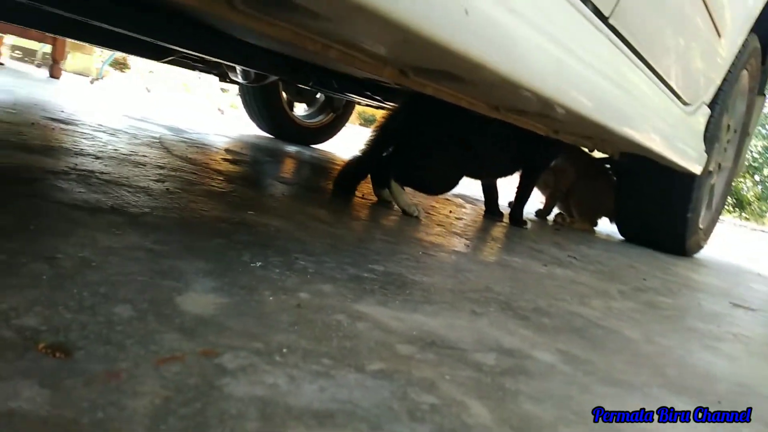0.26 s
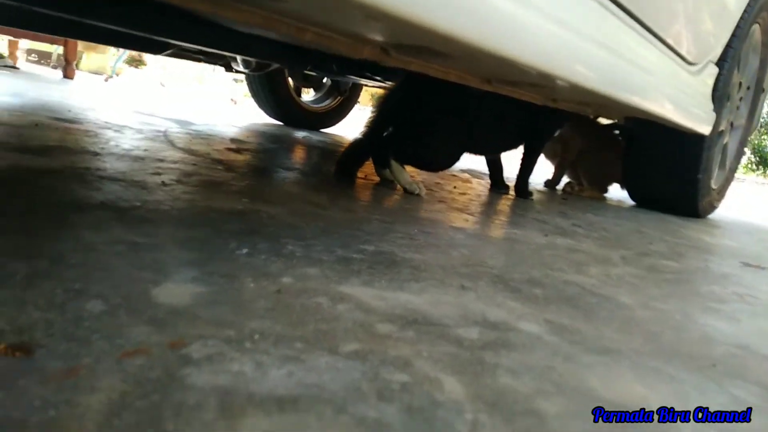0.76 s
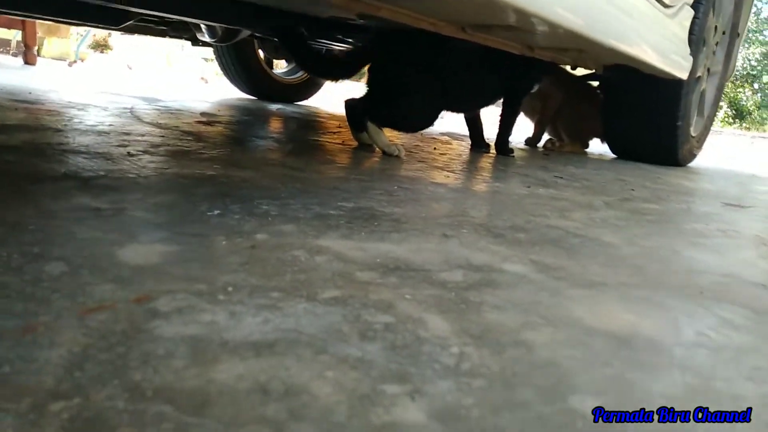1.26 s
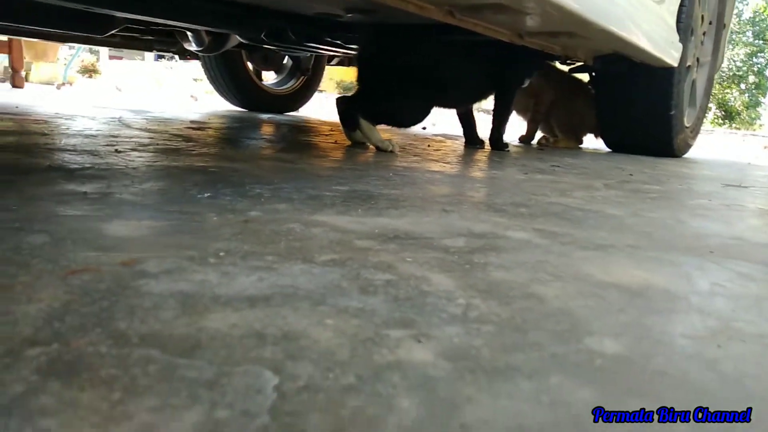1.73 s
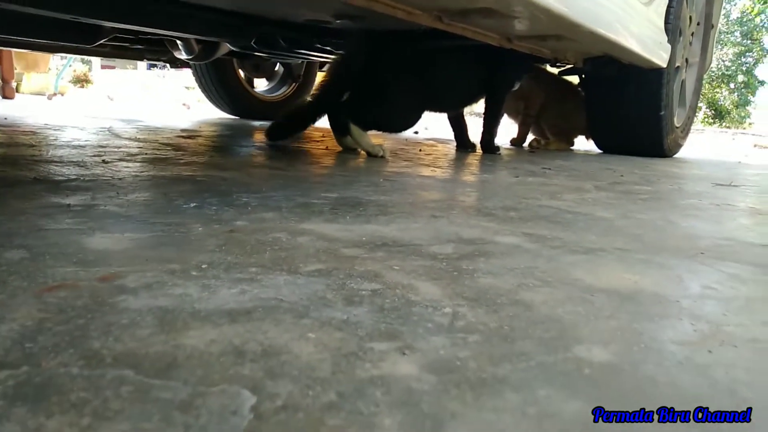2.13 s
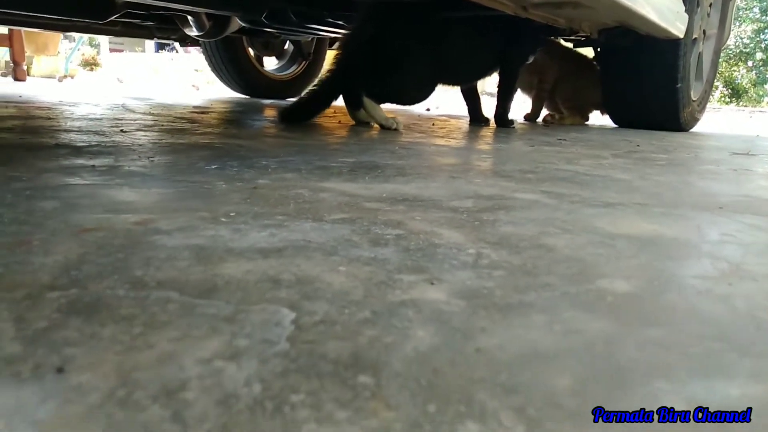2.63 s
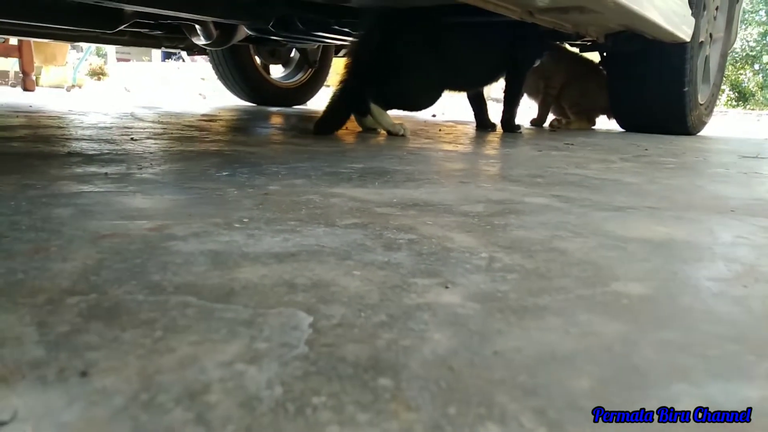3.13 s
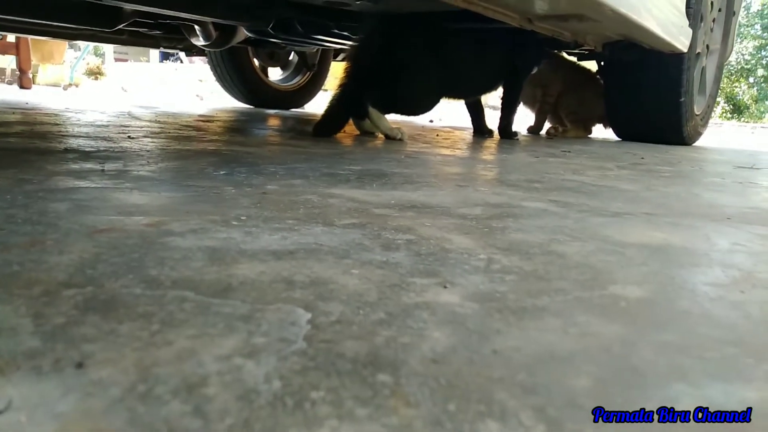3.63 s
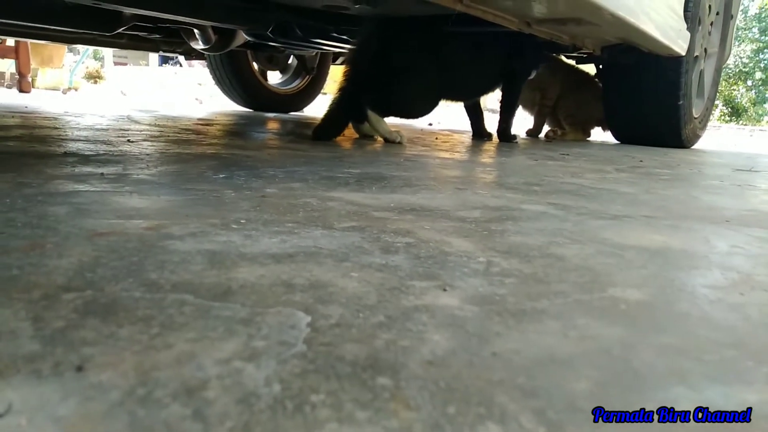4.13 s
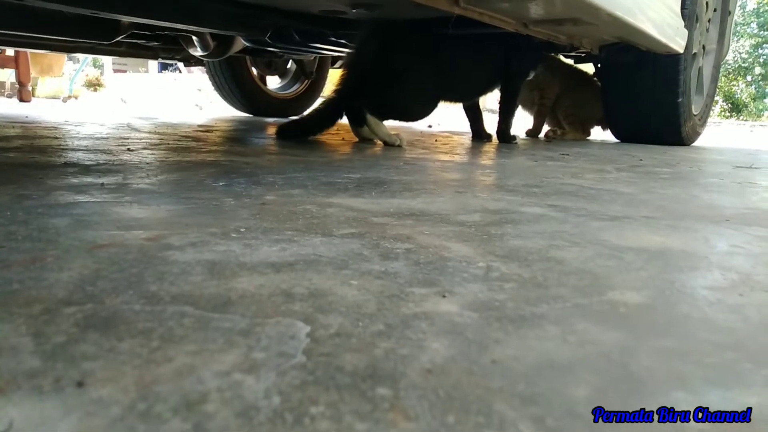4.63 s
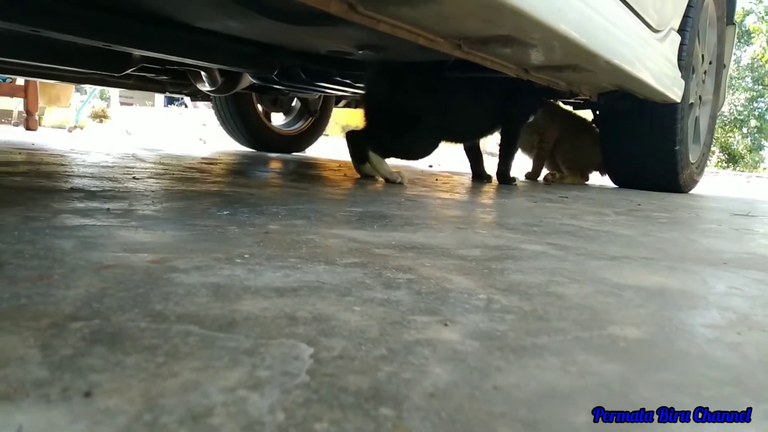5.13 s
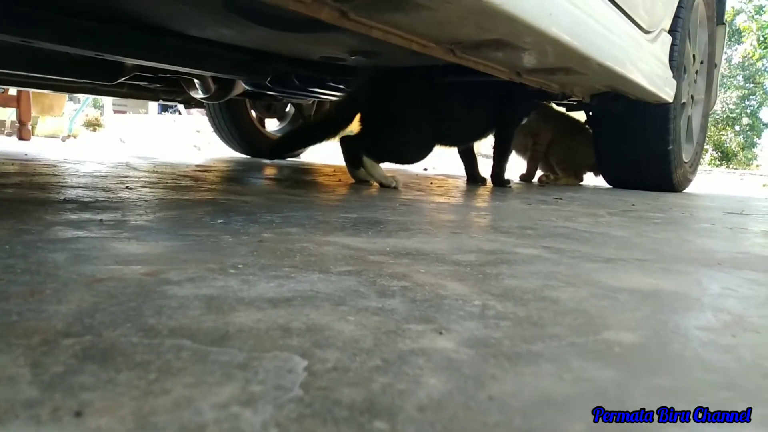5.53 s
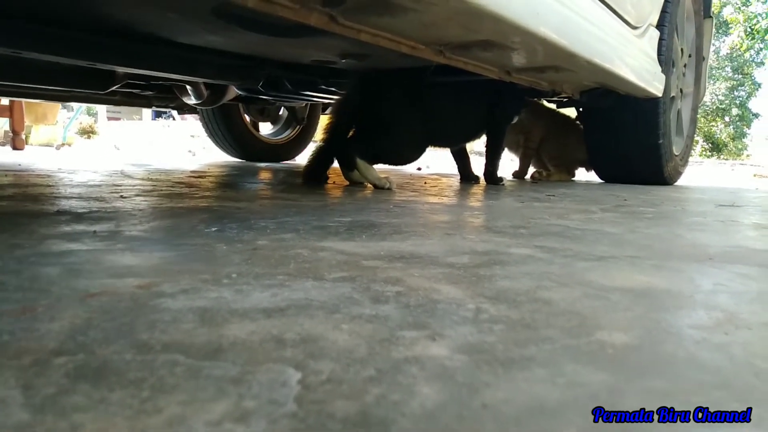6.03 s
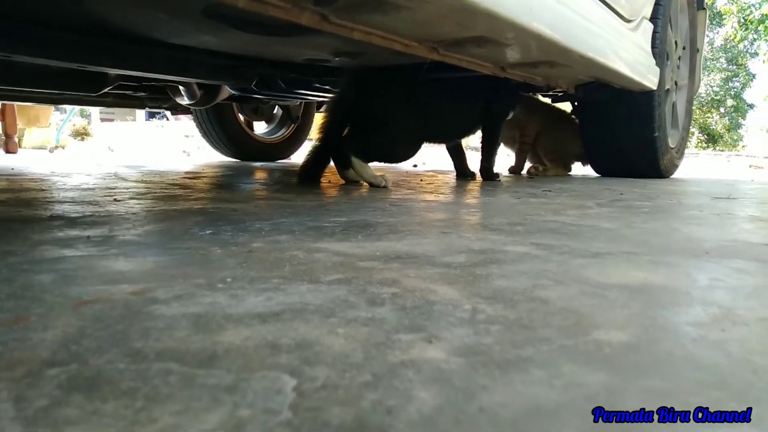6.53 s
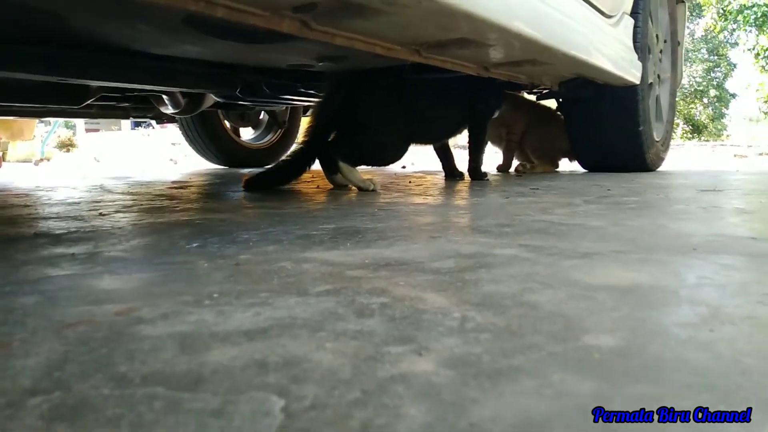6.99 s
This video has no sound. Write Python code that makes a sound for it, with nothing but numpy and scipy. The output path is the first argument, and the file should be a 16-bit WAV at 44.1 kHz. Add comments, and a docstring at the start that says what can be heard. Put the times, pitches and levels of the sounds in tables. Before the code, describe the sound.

Two cats yowl in a standoff beneath a parked car, heard from fairly close over concrete, with a slightly hollow, short reflection. The lower, brighter voice starts almost at once, sweeps up within half a second and holds a loud, open, nasal wail; the higher, thinner cat briefly whimpers at the start and joins at about 0.8 s. Around 1.4 s the first voice catches hoarsely, and both close down into quieter, sinking moans until about 3.3 s. A short lull holds distant chirps and a barely audible tap at 3.8 s. At 3.9 s both leap up together, the loudest moment, with a tiny dry click near 4.3 s. The higher cat fades by 5.4 s; the lower one wails on, sagging gradually, and the higher adds a softer cry from 6.3 s. Both die away near 7.2 s. Faint sparrows, airy hiss and low rumble continue throughout, with a faint wavering hum after 5 s.

```python
"""Cat quarrel under a parked car

Two cats yowl at each other on a concrete floor, their long cries overlapping: vocal-fold harmonics and
breath, shaped by moving mouth resonances. The low space between car and floor cuts fixed dips into the
voices. Sparrows, as gliding sines with echo, chirp far off in the yard over a faint outdoor hiss, a low
rumble and a wavering hum; there is one dry click and one faint tap.
"""
import sys
import numpy as np
from scipy import signal
from scipy.fft import rfft, irfft, next_fast_len
from scipy.io import wavfile
from scipy.ndimage import uniform_filter1d

SR = 44100
rng = np.random.default_rng(int(sys.argv[2]) if len(sys.argv) > 2 else 0)


def generate_wav(sig):
    """Save sig (samples, or channels by samples) to the path in sys.argv[1] as 16-bit PCM at SR."""
    pcm = np.round(np.clip(np.atleast_2d(sig).T, -1, 1) * 32767).astype(np.int16)
    wavfile.write(sys.argv[1], SR, pcm)


N = 320013  # length in samples


def gain_of(db):
    """Decibels to a factor."""
    return 10 ** (np.asarray(db) / 20)


def evened(x):
    """Scales to rms 1."""
    return x / np.sqrt(np.mean(x ** 2) + 1e-20)


def read(points, hz):
    """Reads a spectrum table on a log frequency axis."""
    table_hz, value = np.transpose(points)
    return np.interp(np.log(hz + 1), np.log(table_hz + 1), value)


def add(mix, start_s, sound):
    """Mixes a sound in at a time."""
    part = mix[round(start_s * SR):][:len(sound)]
    part += sound[:len(part)]


def drift(count, rate_hz):
    """Smooth random wander of rms 1."""
    size = max(int(SR / rate_hz), 1)
    return evened(uniform_filter1d(uniform_filter1d(rng.standard_normal(count), size), size))


def hump(hz, centre_hz, width_hz):
    """Gain of a resonance passed twice."""
    return 1 / (1 + (2 * (hz - centre_hz) / width_hz) ** 2)


def noise(colour, patchy_db):
    """Coloured noise of rms 1 whose level drifts in small patches of time and frequency."""
    frames, hz = N // 512 + 5, np.fft.rfftfreq(2048, 1 / SR)
    real, imag, patches = rng.standard_normal((frames, 1025, 3)).T
    patches = uniform_filter1d(patches, size=20, axis=0)
    patches = evened(uniform_filter1d(patches, size=10, axis=1))
    level_db = read(colour, hz)[:, None] + patchy_db * patches
    spectrum = (real + 1j * imag) * gain_of(level_db)
    return evened(signal.istft(spectrum, nperseg=2048, noverlap=1536)[1][:N])


def tail(t60, start_s):
    """Sparse reflections of random sign that die away, energy 1."""
    taps = np.zeros(SR // 2)
    at = np.arange(int(start_s * SR), len(taps) - 22, 22)
    taps[at + rng.integers(0, 22, len(at))] = rng.choice([-1., 1.], len(at))
    taps *= gain_of(-60 * np.arange(len(taps)) / SR / t60)
    return taps / np.linalg.norm(taps)


# relative spectra of the open-air hiss and the low rumble: pitch_hz, density_db (per Hz)
HISS_COLOUR = [(65, -36), (110, 4.5), (258, -4), (433, -6.5), (841, -8), (1500, -15), (2280, -21),
               (4810, -25.5), (6170, -29.5), (15700, -41)]
RUMBLE_SPECTRUM = [(15, -1.5), (45, 5.5), (63, 5.5), (80, -8.5), (130, -33.5)]
HISS_DB, RUMBLE_DB = -57.5, -57  # rms
# a low hum comes and goes: time_s, level_db (rms)
HUM_LEVELS = [(0, -79.5), (4.9, -73), (5.1, -55), (6.2, -57), (6.9, -64)]
HUM_HZ = 62.5


def yard():
    """Hiss of the open air and a low rumble as coloured noise, and a hum as a sine of wavering pitch."""
    hiss = gain_of(HISS_DB) * noise(HISS_COLOUR, patchy_db=2.0)
    rumble = gain_of(RUMBLE_DB) * noise(RUMBLE_SPECTRUM, patchy_db=2.5)
    hum_hz = HUM_HZ * (1 + 0.028 * drift(N, 12))
    hum = np.sqrt(2) * np.sin(2 * np.pi * np.cumsum(hum_hz) / SR)
    hum_db = np.interp(np.arange(N) / SR, *np.transpose(HUM_LEVELS))
    return hiss + rumble + gain_of(hum_db) * hum


# a sparrow repeats one falling chirp: mark_s, level_db (before the echo mix), start_hz
FALLING_CHIRPS = [(.84, -53.5, 4950), (1.33, -53, 5100), (1.823, -56, 4990), (2.403, -54.5, 4890),
                  (3.433, -56, 4850), (3.958, -54.5, 4780), (4.462, -56.5, 4980), (5.76, -56, 4803),
                  (6.164, -55, 4740), (6.785, -56, 4677)]
CHIRP_FALL = 0.56  # end pitch as a share of the start
# fainter birds answer: mark_s, level_db (before the echo mix), start_hz, end_hz
ANSWERING_CHIRPS = [(0.225, -57, 4000, 4450), (0.26, -63, 5250, 5950), (2.16, -65, 5826, 3310),
                    (2.741, -63.5, 5970, 4310), (2.925, -58, 3700, 4365), (2.975, -65, 5270, 5990),
                    (3.34, -64, 5130, 6160), (7.011, -62, 7810, 6160)]


def sparrows():
    """Short far whistles with echo from the yard walls: falling ones hold, then drop; rising ones leap, then hold."""
    out, u = np.zeros(N), np.linspace(0, 1, int(.075 * SR))
    falling = np.clip((u - .35) / .65, 0, 1) ** 1.5
    rising = 1 - np.exp(-u / 0.3)
    chirps = [(*row, CHIRP_FALL * row[-1]) for row in FALLING_CHIRPS]
    for mark_s, level_db, start_hz, end_hz in chirps + ANSWERING_CHIRPS:
        glide = falling if end_hz < start_hz else rising
        hz = start_hz + (end_hz - start_hz) * glide
        hz = hz * (1 + .012 * drift(len(u), 120))
        whistle = np.sin(2 * np.pi * np.cumsum(hz) / SR) * signal.windows.tukey(len(u), .5)
        add(out, mark_s - .008, gain_of(level_db) * whistle)  # starts 8 ms ahead of its mark
    echo = signal.oaconvolve(out, tail(t60=.5, start_s=.003))[:N]
    return .55 * out + gain_of(0.5) * echo


def click():
    """One dry click: a single smooth pulse of seven samples."""
    return gain_of(-17) * np.hanning(7)


def tap():
    """A faint dull tap: a 1460 Hz sine that swells to its peak in 10 ms and dies away."""
    t, peak_s = np.arange(0, .05, 1 / SR), 0.01
    swell = t / peak_s * np.exp(1 - t / peak_s)
    return gain_of(-50) * swell * np.sin(2 * np.pi * 1460 * t)


def under_car(voice, dips, wet_db):
    """Narrow cancellations at fixed frequencies, then a short tail from concrete and sheet metal."""
    size = next_fast_len(N + SR)
    hz = np.fft.rfftfreq(size, 1 / SR)
    gain = np.ones(len(hz))
    for dip_hz, width_hz, depth in dips:
        gain = gain * (1 - np.clip(depth, 0, .97) / (1 + 2j * (hz - dip_hz) / width_hz))
    voice = irfft(rfft(voice, size) * gain, size)[:N]
    return voice + gain_of(wet_db) * signal.oaconvolve(voice, tail(t60=0.28, start_s=.006))[:N]


def fold_roughness(t, catches):
    """Unsteadiness of the vocal folds: a little always, more as a cry starts and at hoarse moments."""
    rough = .012 + 0.14 * np.exp(-(t - t[0]) / 0.09)
    for centre_s, half_width_s, roughness in catches:
        rough = rough + roughness * np.exp(-((t - centre_s) / half_width_s) ** 2)
    return rough


# thin overtones over the resonances: pitch_hz, level_db (relative to the effort, before each cat's trim)
OVERTONE_COLOUR = [(1600, -53.5), (2200, -25), (2700, -43.5), (3300, -48), (5000, -47), (6400, -68.5),
                   (7600, -46.5), (9700, -54.5), (11500, -66.5), (13500, -52.5), (15500, -56.5)]


def breath_noise(effort_db, breath_db, rough):
    """Air rushing past the folds, coloured like the overtones; hoarse moments let more through."""
    count = len(effort_db)
    f = np.fft.rfftfreq(count, 1 / SR)
    colour = gain_of(read(OVERTONE_COLOUR, f)) / (1 + (6000 / (f + 1)) ** 3.3)
    air = irfft(rfft(rng.standard_normal(count)) * colour, count)
    level_db = 0.34 * effort_db + breath_db + 1.5 * drift(count, 10)
    return gain_of(level_db) * air * (1 + 7.4 * rough)


def yowl(rows, upper, ring, shine, build, catches, doublings):
    """Harmonics of the vocal folds shaped by chest, throat and the moving mouth, with breath in the treble."""
    s, *columns = np.transpose(rows)
    t = np.arange(s[0], s[-1], 1 / SR)
    hz, effort_db, mouth = (uniform_filter1d(np.interp(t, s, c), size=600, mode="nearest") for c in columns)
    chest_db, throat_db, mouth_width, thin_db, breath_db = build
    rough = fold_roughness(t, catches)
    # cycles waver a little, and much more where the voice is hoarse
    waver = 0.001606 * drift(len(t), 23.1) + 0.1563 * rough * drift(len(t), 175.0)
    turns = np.cumsum(hz * (1 + waver)) / SR

    # the harmonics' levels are worked out once every 64 samples
    ts, pitch_hz, mouth_hz, effort = t[::64], hz[::64], mouth[::64], gain_of(effort_db[::64])
    when, *higher = np.transpose(upper)
    upper_db, ring_db = (np.interp(ts, when, c) for c in higher)
    ring_hz = ring[0] + ring[1] * pitch_hz
    # neighbouring overtones come and go together in patches
    patches = uniform_filter1d(rng.standard_normal((len(ts), 46)), size=100, axis=0)
    patches = uniform_filter1d(patches, size=2, axis=1)
    flicker_db = 6 * np.clip(evened(patches), -3, 1.9).T
    # and each one breaks up quickly, the more the higher it lies
    crackle = evened(uniform_filter1d(rng.standard_normal((len(ts), 46)), size=6, axis=0)).T
    settle = np.minimum((ts - s[0]) / .25, 1) ** 2  # overtones build up over the first 0.25 s
    top_hz = 2550 * (1 - 0.3 * np.exp(-(ts - s[0]) / 0.16))  # top end lowered as the cry starts
    shines = []
    for width, path in shine:
        path_s, path_hz, path_db = np.transpose(path)
        shine_db = np.interp(ts, path_s, path_db, left=-120, right=-120)
        shines.append((width, np.interp(ts, path_s, path_hz), shine_db))

    out = np.zeros(len(t))
    for k in range(1, 46):
        f = k * pitch_hz
        tract = hump(f, mouth_hz, mouth_width) + gain_of(throat_db) * hump(f, 927, 460)
        # an upper resonance moves with the mouth, a nasal ring with the pitch
        tract = tract + gain_of(upper_db) * hump(f, 1.543 * mouth_hz, 0.81 * mouth_width)
        tract = tract + gain_of(ring_db) * hump(f, ring_hz, 133)
        # an open mouth radiates little far below its resonance, and the tract closes off above its top end
        tract = tract / (1 + (0.35 * mouth_hz / f) ** 21.0) / (1 + (f / top_hz) ** 8.7)
        chest = gain_of(chest_db) * hump(f, 160, 440) * np.minimum(effort / gain_of(-50.0), 1)
        thin_gain = gain_of(read(OVERTONE_COLOUR, f) + thin_db + flicker_db[k])
        thin = effort ** 0.98 * thin_gain * (f < 16000) * settle
        lit = sum(gain_of(db) * hump(f, centre_hz, width) for width, centre_hz, db in shines)
        thin = thin + lit * gain_of(flicker_db[k] / 2) * np.minimum(effort / gain_of(-48), 1)
        thin = thin * (1 + np.minimum(f / 10000, .8) * crackle[k])
        level = np.sqrt((effort * tract) ** 2 + chest ** 2 + thin ** 2)
        out += np.interp(t, ts, level) * np.cos(2 * np.pi * k * turns + 0.51 * k * k)

    # uneven cycles spread a noisy skirt around every harmonic
    out *= np.sqrt(2) * (1 + 2.0 * rough * drift(len(t), 350))
    # alternating cycles put faint lines halfway between the harmonics
    doubling = sum(d * np.exp(-((t - at) / w) ** 4) for at, w, d in doublings)
    out *= 1 + doubling * np.cos(np.pi * turns)
    out += breath_noise(effort_db, breath_db, rough)
    return s[0], out * signal.windows.tukey(len(t), 0.039 / (s[-1] - s[0]))


def cat(calls, dips, **voice_settings):
    """All yowls of one cat as heard through the space under the car."""
    voice = np.zeros(N)
    for rows in calls:
        add(voice, *yowl(rows, **voice_settings))
    return under_car(voice, dips, wet_db=-8)


# one table a yowl: time_s, pitch_hz, effort_db, mouth_resonance_hz
SECOND_YOWLS = [
    [(0.0, 299, -52, 860), (0.055, 271, -46.5, 820), (0.1, 241.4, -62, 600)],
    [(0.75, 402.7, -32.5, 910), (0.88, 459, -28.5, 1220), (0.999, 453, -28.5, 1225),
     (1.144, 463.9, -21, 1420), (1.254, 467, -19, 1193), (1.399, 441.8, -31, 994), (1.548, 438, -34, 646),
     (1.852, 444.4, -34, 670), (2.102, 412.7, -29.5, 598), (2.301, 370, -54, 698),
     (2.446, 355.8, -37, 589.8), (2.701, 338.3, -50, 479.7), (3.0, 268, -51, 374)],
    [(3.87, 221.7, -65.5, 815), (3.99, 377.4, -26, 852), (4.05, 427.8, -29, 900), (4.169, 473, -16, 1357),
     (4.349, 447, -20.5, 1471), (4.499, 443.8, -24, 1274), (4.603, 429.3, -27, 831),
     (4.798, 412.5, -29, 610), (4.928, 389.6, -47.5, 830), (5.132, 321, -46.5, 402),
     (5.302, 256.7, -57, 506), (5.416, 229.5, -55, 511)],
    [(6.3, 350, -57, 750), (6.42, 382, -43, 741), (6.48, 410.6, -32.5, 793), (6.619, 402.1, -30.5, 744),
     (6.749, 430.4, -34.5, 624), (6.88, 432, -36, 542), (7.0, 407, -46.5, 490), (7.253, 323.2, -59.5, 311)],
]
# higher resonances: time_s, upper_db, nasal_ring_db (both relative to the effort)
SECOND_RESONANCES = [(0, -12.5, -24), (6.5, -30, -10), (6.9, -26, -10)]
# nasal ring rising with pitch: base_hz (at zero pitch), slope_hz_per_hz
SECOND_NASAL = (237, 3.24)
# thin resonances wandering through the harmonics: width_hz, path of (time_s, centre_hz, level_db)
SECOND_GLINTS = [(250, [(1.45, 2200, -58), (2.0, 2080, -58), (2.25, 1820, -64), (2.45, 1730, -77.5)])]
# fixed build: chest_db, throat_db (relative to the effort), mouth_width_hz, overtones_db, breath_db (trims)
SECOND_BODY = (-46, -18, 250, -18, -4)
# where reflections from floor and car cancel the voice: centre_hz, width_hz, depth (0-1, held to 0.97)
SECOND_NOTCHES = [(943.5, 163, 0.62), (1090, 78, 0.75), (1240, 110, 0.32), (1673, 280, 0.85)]


def second_cat():
    """The higher voice, with thinner overtones and no hoarse catches."""
    return cat(SECOND_YOWLS, SECOND_NOTCHES, upper=SECOND_RESONANCES, ring=SECOND_NASAL,
               shine=SECOND_GLINTS, build=SECOND_BODY, catches=[], doublings=[])


# one table a yowl: time_s, pitch_hz, effort_db, mouth_resonance_hz
FIRST_YOWLS = [
    [(0.05, 193.2, -46.5, 866), (0.1, 231.3, -32, 965), (0.15, 279.7, -28.5, 1090),
     (0.2, 331.8, -27.5, 1240), (0.294, 348.2, -21, 1080), (0.439, 387.4, -20.5, 1564),
     (0.624, 397.4, -19.5, 1478), (0.803, 379.5, -22, 1493), (1.153, 364.4, -18, 1585),
     (1.262, 360.6, -21.5, 1319), (1.377, 348.4, -30.5, 1310), (1.402, 344.6, -19.5, 1120),
     (1.452, 322.2, -32.5, 1125), (1.552, 322.7, -32, 863), (1.836, 290.4, -37.5, 863),
     (2.031, 260.8, -42, 603), (2.355, 237.3, -42, 790), (2.55, 241.2, -40.5, 742),
     (2.849, 249.4, -38, 823), (3.153, 229.4, -42.5, 600), (3.328, 186.5, -55.5, 532)],
    [(3.9, 173, -52, 880), (3.95, 237.6, -26, 1190), (4.0, 321, -24.5, 1260), (4.05, 365, -20, 1470),
     (4.082, 386.3, -27, 1390), (4.105, 395, -14, 1410), (4.149, 390.2, -17, 1375),
     (4.279, 376.3, -22.5, 1107), (4.409, 392.5, -17.5, 1474), (4.504, 395.7, -16.5, 1654),
     (4.733, 381.7, -21, 1363), (4.9, 367.7, -22.5, 1082), (4.968, 358.3, -26, 1280),
     (5.04, 357.2, -22.5, 1200), (5.292, 351, -24.5, 1424), (5.447, 341.1, -23, 1143),
     (5.551, 345.8, -30.5, 926), (5.746, 324.8, -29, 777), (6.08, 308, -35, 782), (6.13, 282.4, -31, 924),
     (6.2, 291, -32, 860), (6.399, 282.6, -32.5, 860), (6.5, 273, -38.5, 755), (6.62, 250.4, -39, 670),
     (6.76, 241.4, -42, 660), (6.858, 235.1, -47, 649), (7.098, 228, -45.5, 544), (7.252, 197, -45.5, 550)],
]
# higher resonances: time_s, upper_db, nasal_ring_db (both relative to the effort)
FIRST_RESONANCES = [(0.06, -17.5, -6), (0.2, -15.5, -23), (0.44, -14, -30.5), (0.65, -5, -26.5),
                    (1.259, -27, -24), (1.45, -19, -11), (1.65, -64, -30), (2.25, -14, -31),
                    (3.302, -3.5, -33.5), (3.951, -23.5, -40), (4.3, -14.5, -35.5), (5.2, -38, -18.5),
                    (6.55, -37, -45), (7.25, -8, -31)]
# nasal ring rising with pitch: base_hz (at zero pitch), slope_hz_per_hz
FIRST_NASAL = (988, 3.32)
# thin resonances wandering through the harmonics: width_hz, path of (time_s, centre_hz, level_db)
FIRST_GLINTS = [(317, [(0.06, 4460, -72), (0.2, 7720, -56.5), (0.35, 9000, -68.5), (0.6, 10170, -83.5),
                (1.099, 9360, -64), (1.3, 8510, -63), (1.42, 5860, -61.5), (1.55, 4900, -85),
                (4.8, 5088, -81), (5.0, 5288, -67), (5.55, 5270, -62.5), (6.2, 4300, -83)]),
                (680, [(4.0, 7400, -70), (4.2, 8170, -69), (4.6, 8270, -75), (5.0, 7600, -79),
                (5.42, 7430, -67), (5.6, 7760, -85)]), (198, [(0.06, 1830, -51), (0.15, 1710, -37),
                (0.24, 1620, -28), (0.33, 1770, -75), (3.9, 1906, -65.5), (4.02, 2040, -34.5),
                (4.08, 2000, -69.5), (6.65, 1200, -67), (6.8, 1185, -48), (6.92, 1175, -43),
                (7.03, 1150, -76)])]
# fixed build: chest_db, throat_db (relative to the effort), mouth_width_hz, overtones_db, breath_db (trims)
FIRST_BODY = (-50, -14, 300, -6, -1)
# moments where the voice turns hoarse: centre_s, half_width_s, roughness (added)
HOARSE_CATCHES = [(1.41, 0.032, 0.07), (4.962, 0.016, 0.08), (6.103, 0.01975, 0.06)]
# loud stretch where cycles alternate strong and weak: centre_s, half_width_s, depth (0-1)
CYCLE_DOUBLINGS = [(0.546, 0.21, 0.08)]
# where reflections from floor and car cancel the voice: centre_hz, width_hz, depth (0-1, held to 0.97)
FIRST_NOTCHES = [(577, 28, 0.93), (660.6, 138, 0.72), (938.5, 85, 0.95), (1056.4, 82, 0.7), (1137, 39, 1),
                 (1378, 47, 1), (1491, 54, 0.57), (1705, 94, 0.4)]


def first_cat():
    """The lower, brighter voice, with hoarse catches and a stretch of alternating fold cycles."""
    return cat(FIRST_YOWLS, FIRST_NOTCHES, upper=FIRST_RESONANCES, ring=FIRST_NASAL,
               shine=FIRST_GLINTS, build=FIRST_BODY, catches=HOARSE_CATCHES, doublings=CYCLE_DOUBLINGS)


def scene():
    """The yard, the birds, both cats, a click, and a tap in the pause."""
    mix = yard() + sparrows() + second_cat() + first_cat()
    add(mix, 4.2822, click())
    add(mix, 3.765, tap())
    return mix[None]


def record(dry):
    """Band limit: a steep linear-phase low-pass ends the treble at 15.9 kHz."""
    low_pass = signal.firwin(2047, 15900, window=("kaiser", 9), fs=SR)
    return signal.oaconvolve(dry, low_pass[None], "same")


dry = scene()
out = record(dry)
generate_wav(out)
```